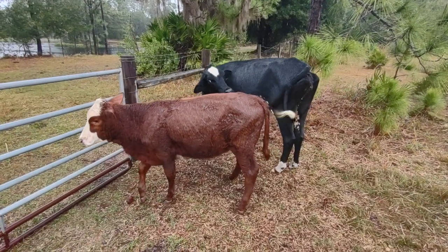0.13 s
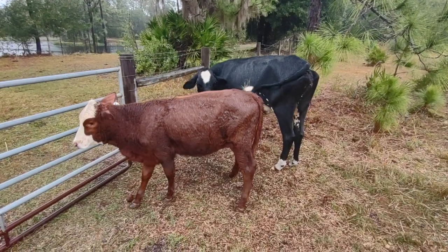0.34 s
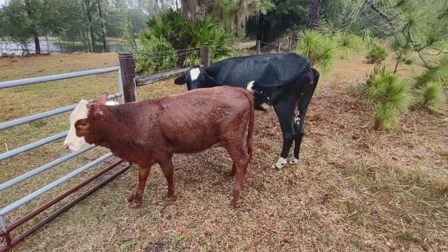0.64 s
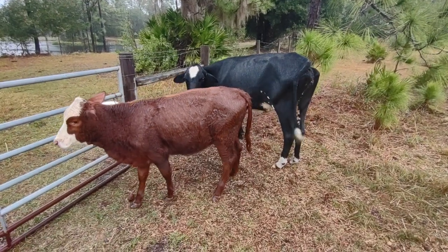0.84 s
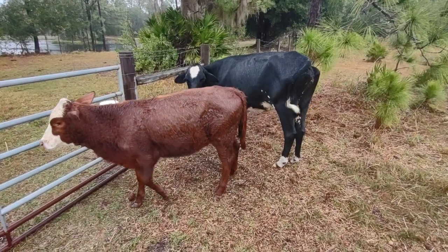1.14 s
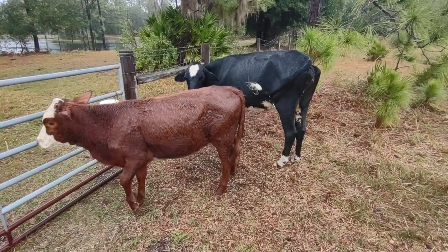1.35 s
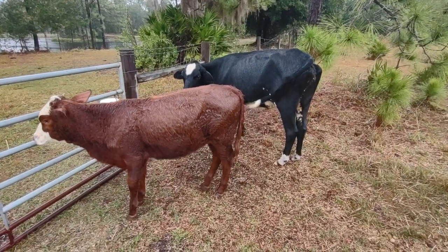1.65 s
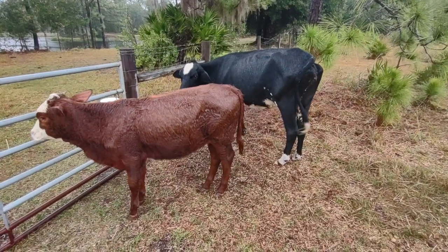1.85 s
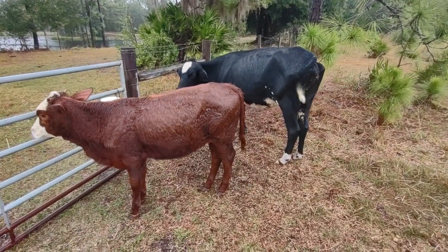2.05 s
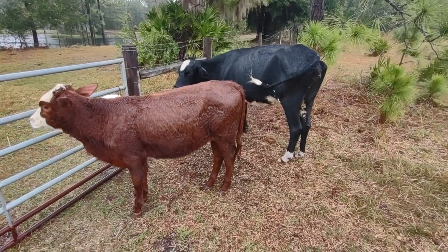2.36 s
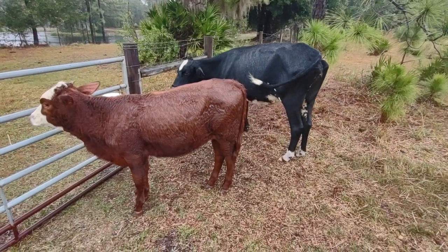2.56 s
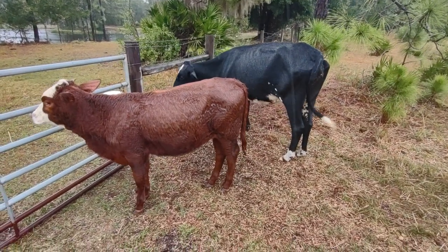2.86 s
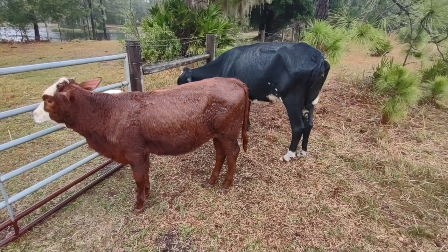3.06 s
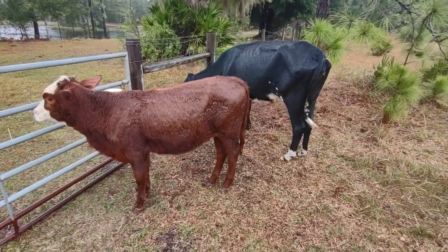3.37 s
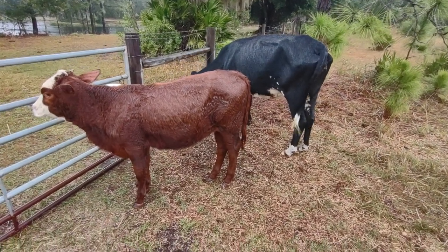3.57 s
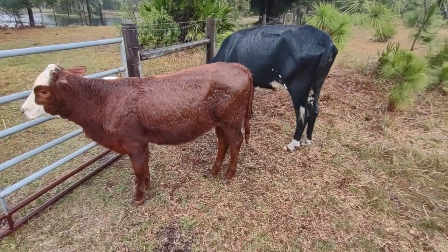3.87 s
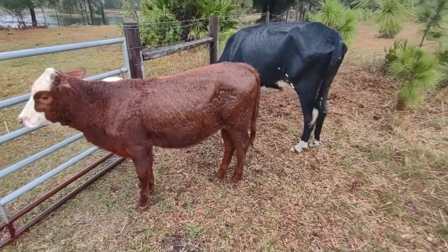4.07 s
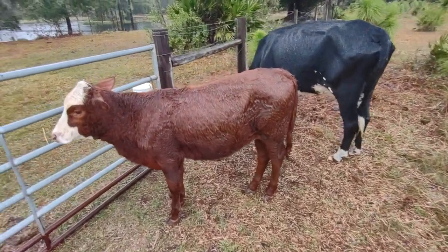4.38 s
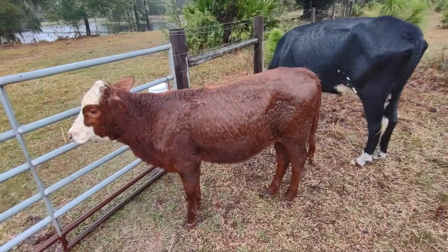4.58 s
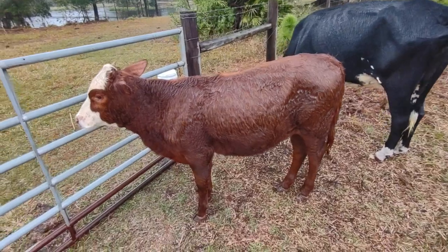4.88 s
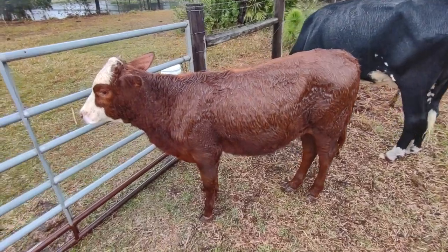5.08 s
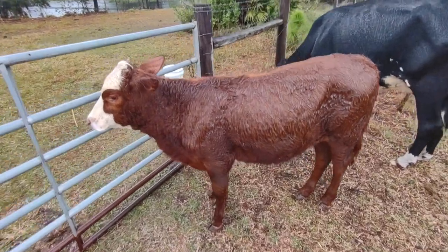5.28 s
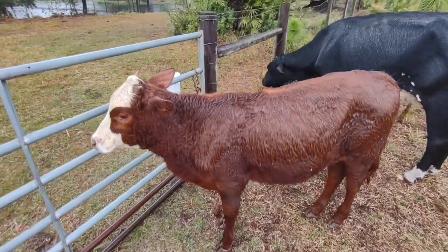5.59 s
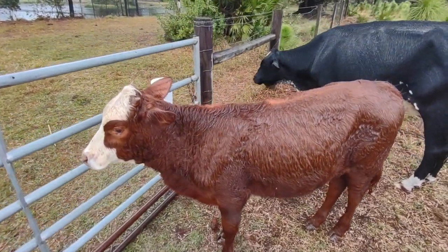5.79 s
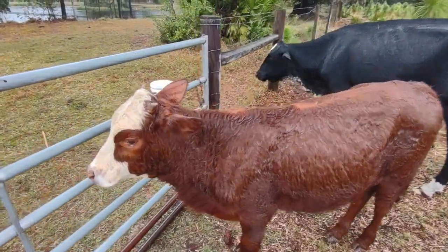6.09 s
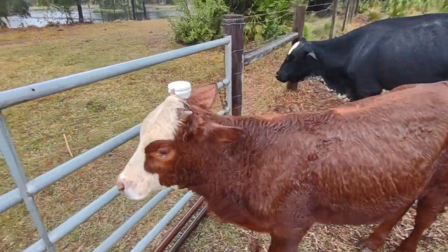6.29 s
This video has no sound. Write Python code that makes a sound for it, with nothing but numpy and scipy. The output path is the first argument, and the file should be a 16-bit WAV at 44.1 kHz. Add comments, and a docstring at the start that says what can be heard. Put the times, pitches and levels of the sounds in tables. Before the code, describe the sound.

Soft rain hisses beside a pasture as a deep motor throbs steadily nearer, while drops tick, damp litter crunches, small squeaks chirp and hollow breaths huff.

```python
"""An eight-cylinder engine idles beside a pasture and grows louder as someone walks nearer through wet litter:
one puff a firing rings the pipe modes, with low turbulent noise beneath. Light rain is coloured noise and grains;
litter rustles and crunches as clumped clicks, drops and twigs tick as short decaying rings, gliding tones make
squeaks, perhaps of wet soles, low grunts and a faint steady whistle, a hollow breathy hiss comes and goes in narrow
modes, low noise puffs as wind on the open microphone port. The left port is partly covered and hears little treble."""
import sys
import numpy as np
from scipy import signal
from scipy.fft import rfft, irfft, next_fast_len
from scipy.io import wavfile
from scipy.ndimage import uniform_filter1d

SR = 44100
rng = np.random.default_rng(int(sys.argv[2]) if len(sys.argv) > 2 else 0)


def dump_mix(stems):
    """Bounce the given channels to the path in sys.argv[1] as a 16-bit WAV at rate SR."""
    frames = np.atleast_2d(stems).T  # one column per channel
    limited = np.clip(frames, -1, 1)  # hard clip at full scale
    pcm = np.round(limited * 32767).astype(np.int16)
    wavfile.write(sys.argv[1], SR, pcm)


N = 283563

# Nearness of the tailpipe. Each row: time in seconds, levels of the deep, throaty and upper parts in dB.
EXHAUST_LEVELS = [(0, -51, -63, -97), (1.0, -51.5, -57.5, -85), (2.5, -50, -50.5, -62.5),
                  (3.35, -48.5, -49, -60), (3.55, -45, -44, -59), (4.2, -43.5, -41.5, -59.5),
                  (5.15, -42.5, -41.5, -60), (5.3, -40, -39.5, -57.5), (5.6, -43.5, -40.5, -56),
                  (6.43, -41, -42, -63)]
# Litter and clothing astir. Each row: time in seconds, rustle level in dB, gain of its dull part in dB.
RUSTLE_LEVELS = [(0, -66.5, -3.5), (1.43, -70, 1.8), (1.84, -75.5, 5.5), (3.0, -70, 1), (3.74, -64, 1.5),
                 (4.87, -63.5, 0.5), (5.16, -65.5, 3), (5.43, -58.5, 0), (5.69, -60.5, 4), (6.43, -59.5, 3)]


def from_db(db):
    """Gain of a level."""
    return 10 ** (np.asarray(db) / 20)


def rms_one(x):
    """Scaled to rms 1."""
    return x / np.sqrt(np.mean(x ** 2) + 1e-20)


def in_time(rows):
    """Columns of a table, interpolated sample by sample."""
    s, *columns = np.transpose(rows)
    return [np.interp(np.arange(N) / SR, s, c) for c in columns]


def at_hz(points, hz):
    """A spectrum table read on a log frequency axis."""
    table_hz, table_db = np.array(points).T
    return np.interp(np.log(hz), np.log(table_hz), table_db)


def colour(x, points):
    """Filtered by a spectrum table."""
    size = next_fast_len(x.shape[-1] + 2048)
    hz = np.maximum(np.arange(size // 2 + 1) * SR / size, 10)
    spectrum = rfft(x, size) * from_db(at_hz(points, hz))
    return irfft(spectrum, size)[..., :x.shape[-1]]


def drift(rate_hz):
    """Slow random wander of rms 1: noise through two equal poles, run at every 40th sample."""
    r = np.exp(-80 * np.pi * rate_hz / SR)
    noise = rng.standard_normal(N // 40 + 2002)
    slow = signal.lfilter([1], [1, -2 * r, r * r], noise)[2000:]
    return np.interp(np.arange(N) / 40, np.arange(len(slow)), rms_one(slow))


def modes(x, table):
    """Two-pole resonances in parallel."""
    out = 0
    for hz, width_hz, gain in table:
        r = np.exp(-np.pi * width_hz / SR)
        a = [1, -2 * r * np.cos(2 * np.pi * hz / SR), r * r]
        out = out + gain * signal.lfilter([1 - r, 0, r - 1], a, x + 1e-18)
    return out


def grains(per_s, spread_db, size):
    """Random clicks of uneven strength and either sign."""
    strength = from_db(spread_db * np.minimum(rng.exponential(1, size), 5))
    sign = rng.choice([-1, 1], size)
    return strength * sign * (rng.random(size) < per_s / SR)


def pair(noise, alike):
    """Two unrelated noises made partly alike."""
    return np.array([alike * noise[1] + np.sqrt(1 - alike ** 2) * noise[0], noise[1]])


def swells(rows, attack_s, release_s):
    """Gain over time: each spell rises ahead of its start, holds for its length and dies away."""
    t = np.arange(N) / SR
    gain = np.zeros(N)
    for s, length_s, level_db in rows:
        rise = np.clip((t - s) / attack_s + 1, 0, 1) ** 2
        fall = np.exp(-np.maximum(t - s - length_s, 0) / release_s)
        gain += from_db(level_db) * rise * fall
    return gain


def rain():
    """Far drops blur to hiss that swells a little; nearer ones stay a fine patter."""
    # Each row: frequency in Hz, density in dB per Hz.
    rain_colour = [(190, -34), (330, -15.5), (408, -10), (602, -11), (964, -15.5), (2320, -8.5),
                   (5750, -13), (7220, -16), (9210, -25), (10700, -28.5), (15200, -25.5), (16000, -21)]
    # Each row: frequency in Hz, left-right likeness from 0 to 1.
    likeness = [(60, 0.37), (240, 0.66), (950, 0.073), (3770, 0.028), (15000, 0.01)]
    level_db, swell_db, swell_hz = -65.5, 1.1, 5.8
    patter = rms_one(grains(900, spread_db=3.5, size=(2, N)))
    shared, own = rng.standard_normal((2, N)) + .8 * patter
    hz, alike = np.array(likeness).T
    left = colour(shared, np.c_[hz, 20 * np.log10(alike)])
    left = left + colour(own, np.c_[hz, 10 * np.log10(1 - alike ** 2)])
    gain = from_db(level_db + swell_db * drift(swell_hz))
    return gain * rms_one(colour(np.array([left, shared]), rain_colour))


def wind():
    """Lumpy low noise, nearly all on the open port: a growing breeze plus gusts."""
    # Each row: frequency in Hz, density in dB per Hz.
    wind_colour = [(25, -33), (45, -14), (75, -4), (125, 0), (170, -5), (250, -14), (400, -38), (900, -100)]
    # Each row: start in seconds, length in seconds, level in dB.
    gusts = [(4.26, .05, -49), (4.42, .13, -47), (5.25, .1, -50), (5.4, .12, -47), (5.7, .08, -50),
             (5.98, .08, -48), (6.2, .07, -40), (6.33, .12, -40)]
    breeze_db, breeze_rise_db_per_s = -72, 2.2
    noise = rms_one(colour(rng.standard_normal((2, N)), wind_colour))
    gain = from_db(breeze_db + breeze_rise_db_per_s * np.arange(N) / SR)
    gain = gain + swells(gusts, attack_s=.025, release_s=.015)
    lumps = from_db(1.8 * drift(14))
    return gain * lumps * noise * from_db([[-18], [0]])   # left, right


def puffing():
    """Breathy hiss: raspy noise in narrow cavity modes that wander together; spells lean bright or dull."""
    # Each row: start in seconds, length in seconds, level at 2 kHz in dB, tilt in dB per octave.
    spells = np.array([(0.35, 0.06, -73, -5), (0.439, 0.2, -70, -5.5), (1.285, 0.17, -86.5, -15.5),
                       (3.71, 1.1, -69, 14.5), (5.262, 0.24, -54, -1.5), (5.626, 0.42, -58, 3),
                       (6.076, 0.4, -64, 2)])
    # Each row: frequency in Hz, width in Hz, signed gain.
    cavity_modes = [(630, 100, .5), (1090, 55, -1.1), (1250, 60, 1.0), (1470, 60, -.9), (1830, 50, .5),
                    (2190, 150, -1.2), (2600, 190, .9), (2900, 170, -.85)]
    rasp, pitch_wander = .5, .015   # share of coarse grain, rms share of pitch
    flow = rng.standard_normal((2, N)) + rasp * rms_one(grains(700, spread_db=3.0, size=(2, N)))
    lowpass = signal.butter(8, 3120, fs=SR, output="sos")
    air = signal.sosfilt(lowpass, pair(flow, 0.055))
    pace = 1 + pitch_wander * drift(3)   # reading faster lifts every mode
    read = np.cumsum(pace / pace.mean()) % (N - 1)
    out = 0
    for mode in cavity_modes:
        level_db = spells[:, 2] + spells[:, 3] * np.log2(mode[0] / 2000)
        gain = swells(np.c_[spells[:, :2], level_db], attack_s=.02, release_s=.1)
        rung = np.array([np.interp(read, np.arange(N), side) for side in modes(air, [mode])])
        out = out + gain * rung
    flutter = from_db(1.5 * drift(30))
    return flutter * out / np.std(modes(air, cavity_modes))


def thin_hiss():
    """Unsteady noise in two resonant bands above the rustle."""
    # Each row: time in seconds, level in dB.
    hiss_levels = [(0, -79.5), (3.47, -77), (4.08, -68), (4.87, -84.5), (5.5, -73), (5.69, -64),
                   (6.16, -64), (6.43, -70.5)]
    # Each row: frequency in Hz, width in Hz, signed gain.
    hiss_modes = [(4480, 280, 1.0), (6100, 900, -.6)]
    gain = from_db(in_time(hiss_levels)[0] + 1.1 * drift(6.5))
    return gain * rms_one(modes(rng.standard_normal((2, N)), hiss_modes))


def rustle():
    """Clumped grains and noise in the litter's colour, with a dull part raised or lowered over time."""
    # Each row: frequency in Hz, density in dB per Hz.
    litter_colour = [(300, 0), (550, 7.5), (1000, 4.5), (1700, 5.5), (2200, 6), (2900, 0.5), (3200, 2.5),
                     (5000, -19.5)]
    rustle_db, dull_db = in_time(RUSTLE_LEVELS)
    fibres = rms_one(grains(1500, spread_db=4.0, size=(2, N))) + .7 * rng.standard_normal((2, N))
    litter = rms_one(colour(pair(fibres, .6), litter_colour))
    dull = colour(litter, [(1200, 0), (1900, -40)])
    gain = from_db(rustle_db + 1.8 * drift(20))
    return gain * (litter + (from_db(dull_db) - 1) * dull)


def crunches():
    """Litter under foot: a quick burst of dense snaps that thins out."""
    # Each row: start in seconds, level before length scaling in dB, length in seconds,
    # tilt about 2.5 kHz in dB per octave.
    crunch_rows = [(0.304, -64, 0.047, 6), (0.928, -66, 0.03, 6), (1.311, -65, 0.072, 4.5),
                   (1.653, -62.5, .015, 1.5), (2.955, -61, 0.031, 3.5), (4.164, -46.5, 0.024, 0),
                   (4.207, -57, 0.014, 0), (5.217, -55.5, 0.022, 5), (5.396, -51, 0.051, 0),
                   (5.978, -46, 0.032, -2), (6.125, -47.5, 0.024, 1.5)]
    # Each row: frequency in Hz, density in dB per Hz.
    crunch_colour = [(400, -1), (1200, 2.5), (2600, 11), (3500, 2.5), (4600, 3.5), (7500, -6),
                     (10000, -19.5), (16000, -27)]
    attack_s = 0.0054
    out = np.zeros((2, N + SR))
    hz, colour_db = np.array(crunch_colour).T
    t = np.arange(SR // 6) / SR
    for s, level_db, length_s, tilt_db in crunch_rows:
        envelope = np.minimum(t / attack_s, 1) * np.exp(-(t / length_s) ** 2)
        burst = grains(14000, spread_db=0.0, size=(2, len(t))) * envelope
        burst = colour(burst, np.c_[hz, colour_db + tilt_db * np.log2(hz / 2500)])
        gain = from_db(level_db) * np.sqrt(length_s / t[-1])
        out[:, round(s * SR):][:, :len(t)] += gain * rms_one(burst)
    return out[:, :N]


def squeaks():
    """Squeaks, perhaps wet soles, with low grunts and a faint steady whistle: unsteady tones with an octave."""
    # Each row: start in seconds, length in seconds, start pitch in Hz, end pitch in Hz,
    # level before shaping in dB, octave against the tone in dB.
    squeak_rows = [(.995, .017, 2400, 2700, -58, -30), (1.148, .014, 2950, 3050, -63, -30),
                   (3.583, .014, 2250, 2450, -62, -7), (3.597, .075, 2580, 3050, -59, -9),
                   (3.668, .03, 3060, 3230, -54, -14), (3.693, .007, 3230, 4450, -53, -30),
                   (3.71, .01, 4550, 4520, -63, -30), (3.697, .013, 4430, 4680, -51, -30),
                   (3.645, .014, 1250, 1270, -53, -20), (3.96, .055, 2360, 2300, -62, -20),
                   (3.712, .016, 2550, 2200, -61, -30), (4.02, .032, 1680, 1370, -63, 5),
                   (4.378, .02, 3450, 3800, -60, -30), (4.398, .016, 3750, 3350, -63, -30),
                   (4.388, .018, 2650, 2800, -55, -30), (4.385, .03, 1420, 1450, -58, -8),
                   (4.425, .025, 2850, 2750, -59, -30), (4.742, .014, 3350, 3450, -54, -30),
                   (4.75, .016, 2950, 2700, -55, -30), (4.738, .013, 2650, 2950, -60, -30),
                   (4.742, .01, 2050, 2250, -59, -30), (5.195, .045, 480, 500, -56, -20),
                   (5.02, .22, 1830, 1820, -68, -30), (5.255, .018, 560, 480, -51, -10),
                   (5.274, .014, 500, 450, -52, -10), (6.205, .025, 2600, 2750, -56, -30)]
    swell_power = 1.6   # over 1: loudest late
    out = np.zeros(N + SR)
    for s, length_s, start_hz, end_hz, level_db, octave_db in squeak_rows:
        share = np.linspace(0, 1, round(length_s * SR))
        jitter = .05 * uniform_filter1d(rng.standard_normal(SR // 4), size=90)[:len(share)]
        glide_hz = start_hz + (end_hz - start_hz) * share
        phase = 2 * np.pi * np.cumsum(glide_hz * (1 + jitter)) / SR
        tone = np.sin(phase) + from_db(octave_db) * np.sin(2 * phase)
        flicker = np.clip(1 + 40 * jitter, .4, 2)
        envelope = np.sqrt(np.sin(np.pi * share ** swell_power))
        out[round(s * SR):][:len(share)] += from_db(level_db) * tone * flicker * envelope
    return out[:N]


def ticks():
    """Drops and twigs: short decaying ring plus 1.9 kHz snap; random faint ones grow as the litter stirs."""
    # Loudest, close by. Each row: start in seconds, ring level in dB, pitch in Hz, snap level in dB
    # (levels before decay and band filter).
    near_ticks = [(.172, -48, 1800, -48), (.36, -51, 1200, -58), (.513, -41, 1500, -46),
                  (.558, -50, 1300, -54), (.705, -51, 1400, -52), (.817, -48, 2250, -48),
                  (.822, -52, 1000, -56), (.926, -46, 1400, -44), (.995, -49, 1100, -42),
                  (1.022, -52, 1300, -48), (1.118, -55, 1500, -50), (1.137, -54, 2000, -52),
                  (1.154, -55, 1800, -54), (1.321, -54, 1500, -49), (.522, -46, 1250, -56),
                  (.602, -50, 1250, -52), (1.421, -47, 1100, -41), (1.658, -56, 2200, -55),
                  (2.016, -45, 1090, -48), (2.065, -41, 850, -34), (2.067, -46, 2600, -44),
                  (2.072, -50, 1700, -56), (2.139, -42.5, 1600, -52), (2.201, -47.5, 845, -59),
                  (2.551, -50, 1380, -40), (2.601, -53, 1000, -56), (2.811, -52, 1140, -56),
                  (3.875, -47, 800, -54), (3.425, -50, 900, -50), (3.363, -50, 1200, -44),
                  (3.496, -44, 1600, -48), (3.524, -48, 1800, -48), (3.528, -36, 1400, -35),
                  (3.693, -48, 1800, -52), (3.842, -49, 1100, -50), (3.546, -41, 2200, -45),
                  (3.893, -48, 2500, -42), (3.981, -40, 1250, -43), (4.068, -48, 2350, -51),
                  (4.325, -50, 900, -50), (4.476, -49, 1000, -52), (4.509, -47, 750, -56),
                  (4.555, -45, 2600, -45), (4.565, -50, 1900, -52), (4.408, -50, 2200, -52),
                  (4.586, -49, 900, -56), (4.616, -46, 975, -41), (4.85, -49, 1820, -54),
                  (4.923, -49, 1700, -54), (5.188, -48, 800, -50), (5.254, -44, 1200, -44),
                  (5.258, -34, 600, -35), (5.4, -39, 760, -44), (5.819, -43, 900, -44),
                  (5.886, -43, 800, -46), (5.938, -45, 800, -48), (6.309, -47, 1000, -46),
                  (5.595, -41, 785, -45), (5.649, -40, 900, -40), (5.844, -40.5, 1020, -31),
                  (5.976, -35, 1250, -37), (6.065, -38, 646, -34), (6.083, -35, 2240, -35),
                  (6.13, -40, 1500, -40), (6.211, -44, 2610, -45)]
    faint_count, faint_db, faint_spread_db = 130, -59.5, 9.0
    follow = .55   # share of the rustle's dB swing
    out, t = np.zeros(N + 1000), np.arange(1000) / SR
    when_s, size, octaves = (rng.random((faint_count, 3)) * [N / SR, 1, 3.5]).T
    astir_db = np.interp(when_s, *np.transpose(RUSTLE_LEVELS)[:2])
    level = faint_db + faint_spread_db * (size - .5) + follow * (astir_db - RUSTLE_LEVELS[0][1])
    faint_ticks = np.c_[when_s, level, 600 * 2 ** octaves, level]   # snap as strong as ring
    for s, ring_db, hz, snap_db in np.r_[np.array(near_ticks), faint_ticks]:
        ring = np.sin(2 * np.pi * hz * t) * np.exp(-t * (hz / 1.8 + 300))
        snap = np.sin(2 * np.pi * 1900 * t) * np.exp(-t * 4500)
        out[round(s * SR):][:1000] += from_db(ring_db) * ring + from_db(snap_db) * snap
    band = signal.butter(3, [520, 4200], "band", fs=SR, output="sos")
    return signal.sosfilt(band, out[:N])


def bright_ticks():
    """Tiny dry snaps: a few quick cycles at a high pitch, rising and dying at once."""
    # Each row: start in seconds, level in dB (1.6 dB below the envelope peak), pitch in Hz.
    bright_rows = [(.109, -63, 14000), (.528, -54, 13000), (.904, -51, 5500), (.942, -54, 5560),
                   (1.322, -52, 4000), (1.584, -62, 14500), (1.658, -54, 4500), (1.828, -56, 5500),
                   (1.908, -55, 6260), (2.962, -54, 4500), (3.649, -57, 5000), (3.962, -55, 5500),
                   (4.168, -48, 8000), (4.168, -50, 13000), (4.212, -53, 6800), (4.27, -62, 13000),
                   (4.576, -62, 14000), (5.221, -51, 6500), (5.399, -56, 13000), (5.475, -61, 14000),
                   (5.896, -60, 9500), (6.121, -54, 7000), (6.131, -50, 10000), (6.213, -45, 5000),
                   (6.263, -57, 13500)]
    out, t = np.zeros(N + 200), np.arange(200) / SR
    for s, level_db, hz in bright_rows:
        cycles = hz * t
        envelope = cycles * np.exp(1 - cycles / 1.2)
        out[round(s * SR):][:200] += from_db(level_db) * np.sin(2 * np.pi * cycles) * envelope
    return out[:N]


def rumble():
    """Turbulent gas in the pipe: low noise that follows the deep part of the exhaust."""
    # Each row: frequency in Hz, density in dB per Hz.
    rumble_colour = [(20, -44), (45, -14), (80, -7.5), (160, -7), (260, -6), (400, -24.5), (800, -58)]
    start_db, follow = -66, 1.1   # follow: share of the deep part's dB swing
    deep_db = in_time(EXHAUST_LEVELS)[0]
    gain = from_db(start_db + follow * (deep_db - deep_db[0]))
    return gain * rms_one(colour(rng.standard_normal(N), rumble_colour))


def engine():
    """One puff a firing, delayed by its manifold path and shaped by harmonic strengths, rings the pipe modes."""
    # Each row: time in seconds, firings per second.
    speed = [(0, 77.69), (.81, 77.03), (3.1, 76.78), (3.3, 76.6), (3.47, 78.3), (3.9, 77.35), (4.35, 78.25),
             (5.0, 77.55), (5.2, 79.0), (5.65, 76.6), (5.85, 77.6), (6.15, 76.2), (6.43, 76.4)]
    # Firing order; banks fire unevenly, one has the longer pipe.
    # Each row: strength in dB, manifold path delay in seconds.
    cylinders = [(-1.3, 0.0044), (1.5, 0.00508), (3.8, 0.00021), (4.7, 0.00445), (-4.7, 0.0),
                 (0.6, 0.00097), (4.6, 0.00481), (-1.2, 6e-05)]
    # Uneven strengths of the engine's harmonics. Each row: frequency in Hz, gain in dB.
    harmonic_colour = [(29, -7), (48, 0), (68, -4), (77, 0), (87, 4), (106, 0), (116, -8), (126, 0),
                       (164, 0), (174, -2), (184, 1), (194, 4), (204, 0), (223, 6), (233, -1), (243, 12),
                       (252, -5), (262, 7), (272, -3), (281, -4), (291, 5), (301, 0), (311, -6), (360, -8)]
    # Pipe modes, three tables. Each row: frequency in Hz, width in Hz, signed gain.
    deep_modes = [(45.8, 5.6, 0.066), (67.1, 4.6, -0.46), (103.4, 60.6, 0.28), (106.8, 10, 0.21),
                  (134.66, 8.4, 0.68)]
    throaty_modes = [(155.9, 18.1, -0.56), (178.9, 19.6, 0.49), (211.3, 9.53, -0.84)]
    upper_modes = [(268, 9.1, 0.9), (242.2, 3.5, -0.37)]
    first_firing = .39   # share of a firing gap already gone at the start
    run_in = SR // 4   # lets the modes settle
    rate = np.pad(in_time(speed)[0], (run_in, 0), mode="edge")
    firings = (np.cumsum(rate) - rate[0] * run_in) / SR + first_firing
    count = np.floor(firings).astype(int)
    at = np.flatnonzero(np.diff(count)) + 1
    strength_db, path_s = np.array(cylinders)[count[at] % 8].T
    puffs = np.zeros(N + 2 * run_in)
    puffs[at + (path_s * SR).astype(int)] = from_db(strength_db + .35 * rng.standard_normal(len(at)))
    puffs = signal.sosfilt(signal.butter(6, 300, fs=SR, output="sos"), puffs)
    puffs = signal.sosfilt(signal.butter(2, 40, "high", fs=SR, output="sos"), puffs)
    puffs = colour(puffs, harmonic_colour)
    out = np.zeros(N)
    for part_db, part_modes in zip(in_time(EXHAUST_LEVELS), (deep_modes, throaty_modes, upper_modes)):
        rung = modes(puffs, part_modes)[run_in:run_in + N]
        out += from_db(part_db) * rms_one(rung)
    return out


def scene():
    """Sound at the two ports; the exhaust reaches the left one a little late."""
    port_lag_s = 0.00076
    lag = round(port_lag_s * SR)
    left = engine() + rumble()
    right = np.r_[left[lag:], left[-lag:][::-1]]   # mirrored tail fills the end
    weather = rain() + wind()
    steps = rustle() + thin_hiss() + crunches() + squeaks()
    return np.array([left, right]) + weather + puffing() + steps + ticks() + bright_ticks()


def record(dry):
    """The covered left port loses treble; both are cut steeply at the top."""
    # Loss at the covered port. Each row: frequency in Hz, gain in dB.
    cover = [(60, -1), (200, -2.5), (380, -1.5), (700, -7), (1290, -10), (2380, -17), (4400, -18),
             (8120, -14), (11000, -3.5), (15000, -4)]
    cutoff_hz = 15720
    ports = np.array([colour(dry[0], cover), dry[1]])
    return signal.sosfilt(signal.ellip(10, 1, 50, cutoff_hz, fs=SR, output="sos"), ports)


dry = scene()
out = record(dry)
dump_mix(out)
```